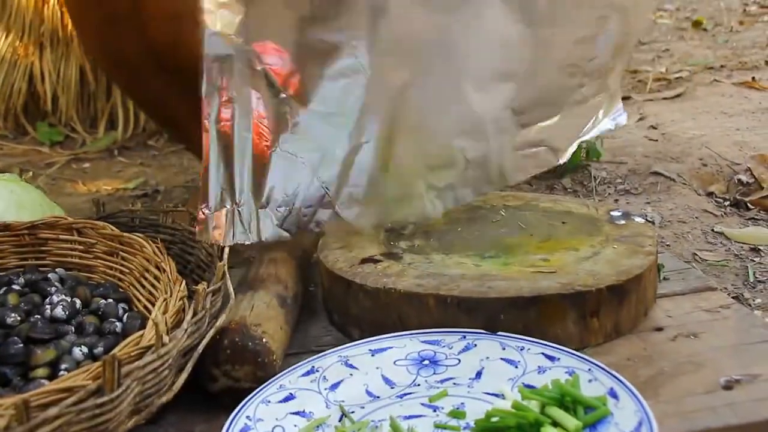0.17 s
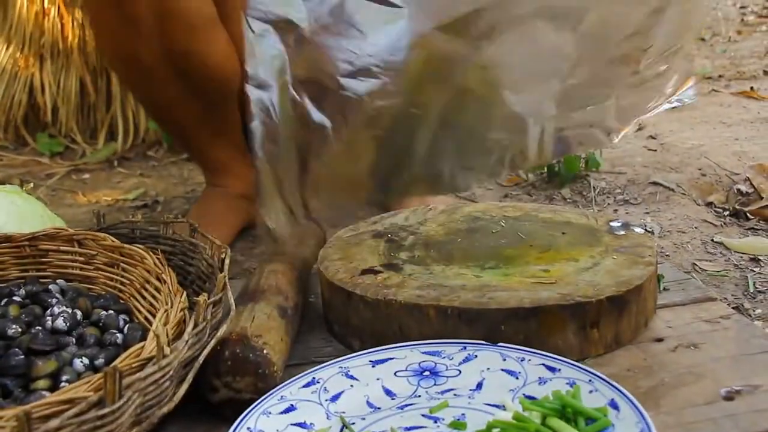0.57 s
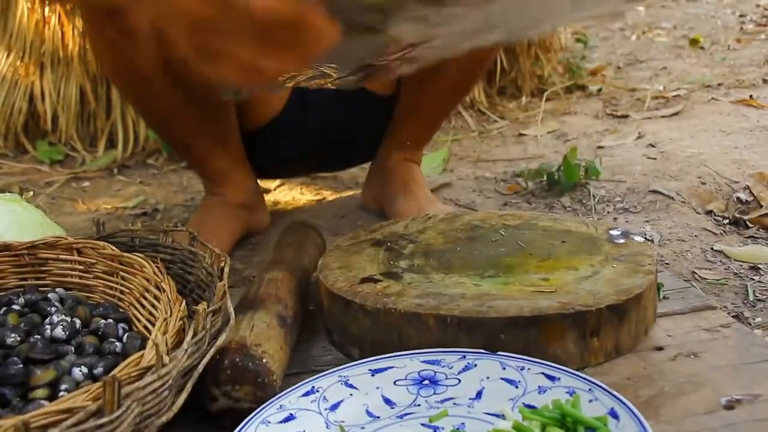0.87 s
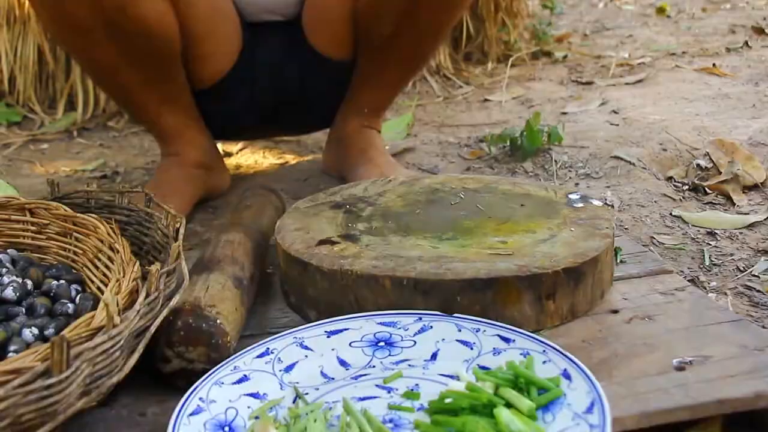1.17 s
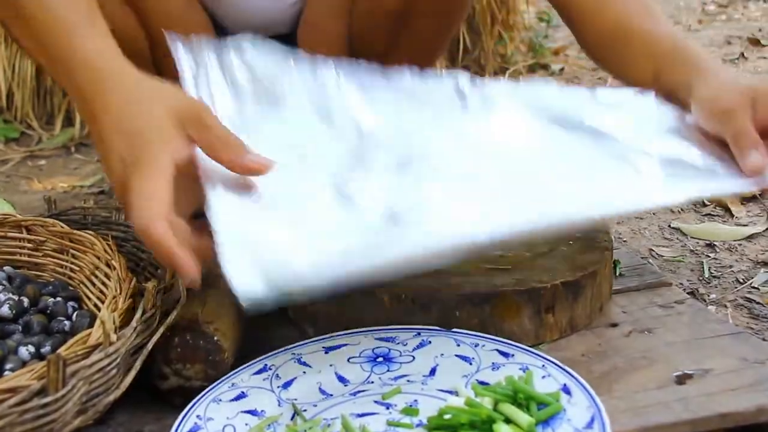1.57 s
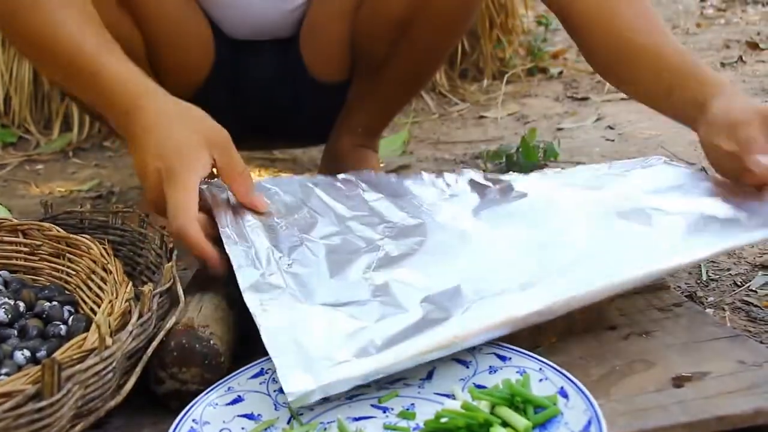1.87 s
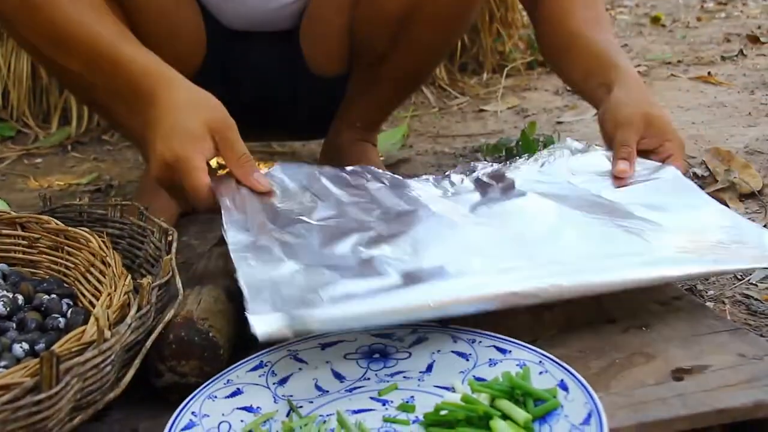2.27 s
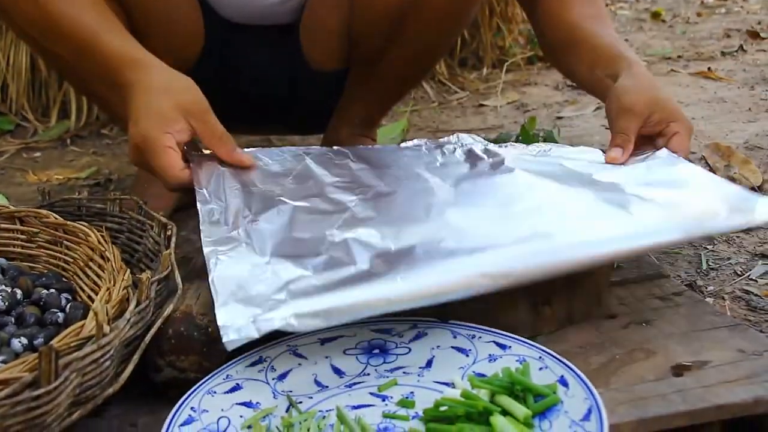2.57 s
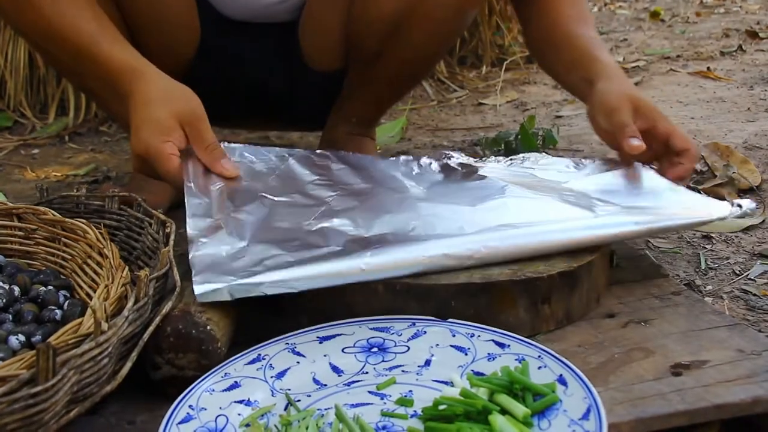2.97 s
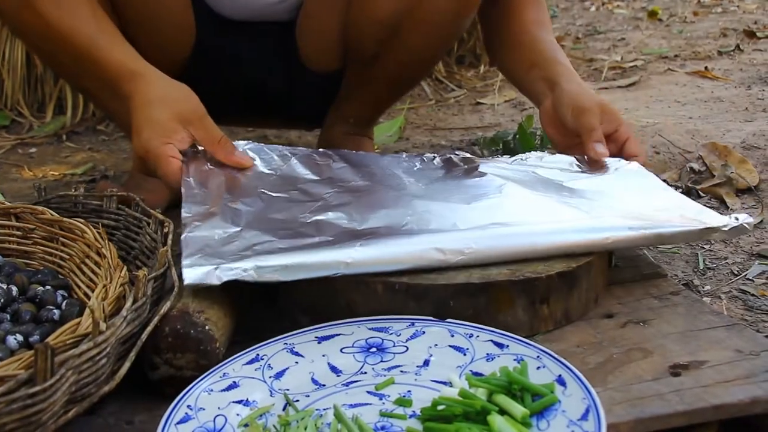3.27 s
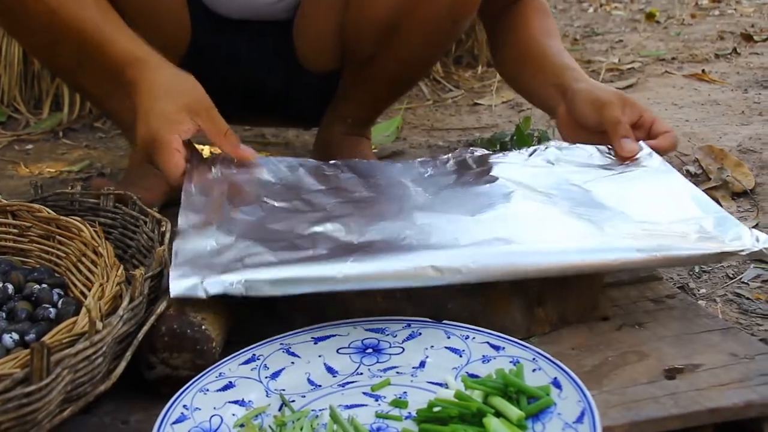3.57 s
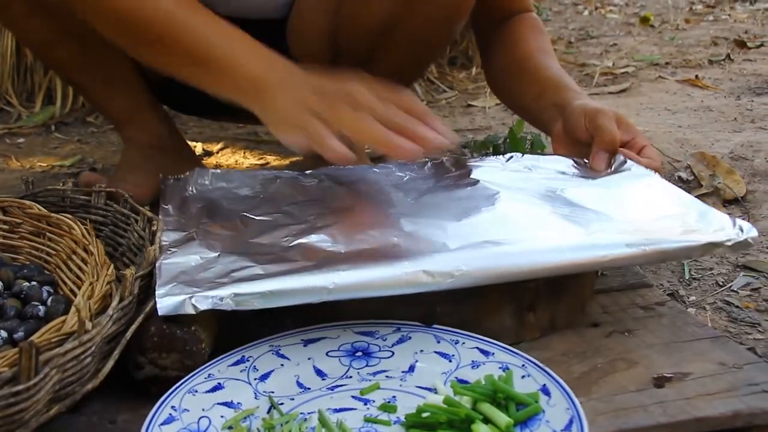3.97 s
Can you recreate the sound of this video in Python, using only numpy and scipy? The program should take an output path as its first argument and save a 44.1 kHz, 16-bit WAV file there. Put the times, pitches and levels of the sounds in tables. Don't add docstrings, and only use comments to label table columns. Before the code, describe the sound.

Close, dry, mono outdoor sound of aluminium foil being handled. From 0 to about 0.7 s, the sheet is tugged in quick, loud bursts: dense bright crinkling, needle-sharp clicks and several hard, pitched cracks, each with a tinny shimmer lasting under a tenth of a second, plus edge snaps and soft low flaps. It drops to lighter rustling around 0.75-0.9 s, crackles again near 1 s, then thins until about 1.5 s. At 1.55 and especially 1.75 s, strong crackles and a flap return as the sheet is swung round. From 2.05 to 3.1 s it is laid down and squared up in irregular heavy crunches, fuller in the middle and less hissy. After 3.2 s, quieter, scattered crinkles and small ticks continue with smoothing to the end, about 4.1 s. Behind it all are a faint dry rustle and a low, steady, throbbing distant small-engine drone.

```python
import sys
import numpy as np
from scipy import signal
from scipy.io import wavfile

SR = 44100
rng = np.random.default_rng(int(sys.argv[2]) if len(sys.argv) > 2 else 0)


def wav_record(signal):
    frames = np.transpose(np.atleast_2d(signal))
    bounded = np.clip(frames, -1, 1)
    quanta = np.round(bounded * 32767).astype(np.int16)
    wavfile.write(sys.argv[1], SR, quanta)


def magnitude_from_level(level_db):
    exponent = np.asarray(level_db, float) / 20
    return 10 ** exponent


N = 182260

# f/Hz, level/dB per Hz
SHEET_TONE = [(210, -38), (350, -13.5), (474, -16.5), (674, -3.5), (1140, -6), (1570, 2.5), (2800, 4),
              (4450, 2.5), (5060, 3.5), (7430, 1.5), (9750, -6.5), (13600, -6.5), (16000, -13)]
# start t/s, hold t/s, crumpling level/dB, fine creases level/dB re crumpling
HAND_STROKES = [(0.0, 0.076, -20, -7.5), (0.159, 0.0096, -13, -12), (.228, 0.061, -17, -12),
                (0.344, 0.032, -14, -12), (0.398, 0.037, -18.5, -9), (0.467, 0.021, -13.5, -8),
                (.56, .14, -20, -11), (0.821, 0.19, -25, -14.5), (0.935, 0.03, -18.5, -12),
                (0.994, 0.058, -19, -12), (1.234, 0.059, -28.5, -12), (1.49, 0.0082, -32, -18),
                (1.551, 0.049, -20, -14), (1.738, 0.08, -12.5, -17.5), (1.909, 0.076, -22, -23),
                (2.068, 0.017, -17, -11), (2.156, 0.085, -23, -26), (2.266, 0.12, -15, -16),
                (2.45, 0.045, -17.5, -11), (2.535, 0.033, -18, -15), (2.652, 0.011, -17.5, -16),
                (2.865, 0.036, -16, -20), (2.947, 0.018, -18.5, -7), (3.072, .055, -18.5, -10.5),
                (3.405, 0.027, -25.5, -10.5), (3.492, 0.091, -23, -14), (3.564, 0.062, -25.5, -11.5),
                (3.777, .015, -30, -25), (3.931, .05, -25, -25), (4.036, 0.0087, -21.5, -15)]
# t/s, restlessness level/dB, free folds level/dB re crumpling
SLACK_SHEET = [(0.0, -18, -9.5), (.7, -27.5, -10), (.76, -35, -14), (.9, -28.5, -12), (1.12, -27, -9),
               (1.34, -28, -14), (1.44, -32.5, -34), (1.7, -28, -10), (1.9, -25.5, -14.5),
               (2.2, -27, -11.5), (2.5, -22, -11.5), (2.8, -26.5, -8.5), (3.04, -19.5, -12),
               (3.15, -23.5, -9), (3.22, -33.5, -4.5), (3.5, -28, -8.5), (3.8, -25.5, -11.5),
               (4.13, -32, -10.5)]
# t/s, level/dB re crumpling
BELLY_LEVEL = [
    (0.0, -9.5),
    (1.9, -5.5),
    (2.3, -2.5),
    (4.13, -0.5),
]
# t/s, peak
# level/dB, highs level/dB re peak, favoured f/Hz
BIG_BUCKLES = [(0.138, -1, -20, 5310), (0.167, -2, -13, 5100), (0.23, 2.5, -20, 5140),
               (.3448, 1.5, -19, 3630), (.355, 3, -18, 4340), (.3998, -8.5, -22, 2670),
               (0.469, 1.5, -21, 3500), (0.5658, -1, -19, 3030), (0.6555, -2.5, -16, 2780),
               (0.8015, -11.5, -17, 6350), (.83, -12, -21, 3660), (.8505, -7, -17.5, 5400),
               (0.908, -9.5, -13, 5450), (0.934, -3.5, -13.5, 4930), (0.9973, 1.5, -21, 2700),
               (1.1248, -6, -17.5, 3570), (1.1638, -12.5, -17, 3050), (1.243, -8, -10.5, 7500),
               (1.282, -11.5, -15, 2400), (1.3408, -7.5, -24, 4470), (1.371, -9.5, -21, 2100),
               (1.3864, -10.5, -11, 7340),
               (1.4504, -15.5, -6.5, 5170), (1.496, -11, -27, 6000), (1.532, -12, -24, 6500),
                (1.551, -3, -11, 5900), (1.6635, -9, -28, 2000), (1.6862, -10, -25, 4840),
                (1.738, 3.5, -24, 1500), (1.762, 2.5, -29, 4500), (1.7982, -0.5, -12, 6350),
                (1.9222, -3, -23, 2780), (2.0582, -11, -17, 7210), (2.0736, -1, -15, 2170),
                (2.163, -2.5, -24, 2460), (2.2208, -3.5, -27, 2120), (2.2663, -1, -22, 3105),
                (2.3145, 4, -28, 2093), (2.361, 2.5, -18, 4970), (2.4326, -3, -21, 3180),
                (2.458, -0.5, -22, 2580), (2.483, -0.5, -16.5, 2090), (2.537, 2.5, -23, 2880),
                (2.638, -5.5, -30, 3170), (2.654, 0.5, -30, 1960), (2.709, -5.5, -22, 2800),
               (2.7719, -5.5, -17.5, 5810), (2.806, -8.5, -14, 6160), (2.8647, -3, -24, 1500),
                    (2.8835, 1.5, -32, 1598), (2.9405, -18, -26, 2870), (2.999, -1, -28, 2000),
                    (3.029, -3, -20, 3070), (3.054, -6.5, -20, 4000), (3.105, -2, -20, 3000),
                    (3.234, -10.5, -22.5, 1540), (3.2757, -15.5, -21, 5100), (3.291, -15, -21, 2140),
                    (3.3134, -12.5, -16, 5020), (3.351, -7.5, -27, 4140), (3.3728, -5.5, -15, 1570),
                    (3.4158, -23, -22, 5080), (3.488, -16, -22, 2150), (3.686, -8.5, -22, 4800),
                    (3.7636, -5, -17, 4915), (3.8017, -8, -19, 4000), (3.8372, -5.5, -27, 2090),
                    (3.8697, -7, -25, 3183), (3.929, -6.5, -24, 2040), (3.9415, -4.5, -21, 6400),
                    (3.9924, -7.5, -21, 2720), (4.0353, -11.5, -20, 2220)]
# t/s, peak level/dB
TINY_CREASES = [(0.7667, -32), (1.048, -15), (1.3244, -25), (1.6178, 0), (1.705, -25), (1.7274, -15),
                (1.952, -5), (2.0934, -23), (2.7322, -15), (3.0749, -13), (3.1602, -22), (3.1936, -41),
                (3.4994, -17), (3.5379, -2), (3.5738, -17), (3.6102, -2), (3.9165, -25), (4.0587, -4)]
# t/s, peak level/dB, f/Hz
EDGE_SLAPS = [(2.0752, -2.5, 760), (0.14, -6, 4300), (0.34, -3, 2808), (1.77, -6, 970), (3.3497, -10, 3500),
              (3.992, -19, 720), (1.3, -21, 5500), (1.496, -22, 3500), (1, -10, 5700), (1.8, -13, 3600),
              (2.5, -9, 6800)]
# t/s, level/dB
SHEET_FLAPS = [(.08, -29.5), (.14, -35.5), (.37, -32.5), (.41, -35), (.485, -39), (.97, -42),
               (1.745, -32.5), (2.07, -59), (2.45, -41.5), (2.75, -47), (3.1, -32.5), (3.45, -41)]
# f/Hz, level/dB per Hz
FLAP_TONE = [(60, -14), (120, -7), (270, 4.5), (380, -11), (520, -27.5)]
# f/Hz, level/dB per Hz
REST_TONE = [(1200, 9), (2500, 18), (5300, -3), (7400, -47), (9800, -53), (15800, -30)]
# t/s, firing f/Hz, drone level/dB
ENGINE_DRONE = [(0.0, 26.52, -37), (.35, 26.5, -41), (.53, 26.5, -57), (.6, 26.44, -39), (.79, 26.5, -40),
                (1.03, 26.6, -35), (1.72, 26.35, -35), (1.86, 26.4, -38), (2.05, 26.5, -35),
                (2.46, 26.3, -35.5), (3.2, 26.7, -34.5), (4.13, 26.4, -34.5)]
# multiple of firing f, level/dB
ENGINE_ORDERS = [(1, -32), (2, -12.5), (3, -24.5), (4, -17.5), (5, -17), (6, 1), (7, -5.5), (8, -16),
                 (9, -5), (10, -4), (11, -16.5), (12, -12)]
# f/Hz, level/dB per Hz
EXHAUST_TONE = [(22, -22), (35, -37), (50, -1.5), (120, 1), (300, -4.5), (450, -18), (750, -5.5),
                (1100, -23.5), (1500, -12)]


def rms_one(x):
    return x / np.sqrt(np.mean(x ** 2) + 1e-20)


def in_time(rows):
    s, *columns = np.transpose(rows)
    return [np.interp(np.arange(N) / SR, s, column) for column in columns]


def at_hz(points, hz):
    point_hz, db = np.transpose(points)
    return np.interp(np.log(hz), np.log(point_hz), db)


def drift(rate):
    r = np.exp(-80 * np.pi * rate / SR)
    slow = signal.lfilter([1], [1, -2 * r, r * r], rng.standard_normal(N // 40 + 2002))[2000:]
    return np.interp(np.arange(N) / 40, np.arange(len(slow)), rms_one(slow))


def band(x, low, high):
    return signal.sosfilt(signal.butter(2, [low, high], "band", fs=SR, output="sos"), x)


def dying(energy, t60):
    return signal.lfilter([1], [1, -magnitude_from_level(-120 / (t60 * SR))], energy + 1e-18)


def rumble(spectrum, patchy_db):
    edges = np.geomspace(20, 1500, 14)
    white = rng.standard_normal((2, N + SR))
    out = 0
    for k, (low, high) in enumerate(zip(edges, edges[1:])):
        level = magnitude_from_level(at_hz(spectrum, np.sqrt(low * high)) + patchy_db * drift(8.3))
        out = out + level * band(white[k % 2], low, high)[SR:]
    return rms_one(out)


def swells(start, hold, db, rise, sag, fall):
    t = np.arange(N) / SR - start[:, None]
    held = np.clip(t, 0, hold[:, None])
    released = np.maximum(t, 0) - held
    return magnitude_from_level(2 * (db[:, None] + rise * np.minimum(t, 0) - sag * held - fall * released))


def handling():
    start, hold, db, fine_db = np.transpose(HAND_STROKES)
    slack_db, folds_db = in_time(SLACK_SHEET)
    rise, sag = 2200, 3
    total = swells(start, hold, db, rise, sag, fall=321).sum(axis=0) + magnitude_from_level(2 * slack_db)
    fine = swells(start, hold, db + fine_db, rise, sag, fall=511).sum(axis=0)
    fine = fine + magnitude_from_level(2 * (slack_db - 17.5))
    return 10 * np.log10(total), folds_db, 10 * np.log10(fine / total), in_time(BELLY_LEVEL)[0]


def sheet_edges():
    return np.geomspace(330, 16500, 21)


def lows_and_highs(hz):
    return at_hz([(1000, 1), (1700, 0.0095)], hz), at_hz([(6000, 0.031), (11500, 0.78)], hz)


def ring_factor(hz):
    return (4000 / hz) ** 0.24


def sheet_weight(low, high):
    return magnitude_from_level(at_hz(SHEET_TONE, np.sqrt(low * high)) - 36.5) * np.sqrt(high - low)


def foil():
    white = rng.standard_normal((2, N))
    return crumpling(white) + buckles(white[::-1])


def crumpling(white, creases_per_s=1800, spread_db=4.0, own_db=4.0, t60=0.1, click_db=-1.0, wash_db=7.0):
    crumple_db, folds_db, fine_db, belly_db = handling()
    at = np.flatnonzero(rng.random(N) < creases_per_s * magnitude_from_level(1.6 * drift(25)) / SR)
    size_db = spread_db * np.minimum(rng.exponential(1, len(at)), 4.2)
    sign = rng.choice([-1, 1], len(at))
    edges, out = sheet_edges(), np.zeros(N)
    for k, (low, high) in enumerate(zip(edges, edges[1:])):
        hz = np.sqrt(low * high)
        clicks = np.zeros(N)
        clicks[at] = sign * magnitude_from_level(size_db + own_db * rng.standard_normal(len(at)))
        shimmer = dying(clicks ** 2, t60 * ring_factor(hz))
        shimmer = shimmer / shimmer.mean() + magnitude_from_level(2 * wash_db + 2.4 * drift(48))
        noise = rms_one(band(white[k % 2], low, high))
        bed = rms_one(noise * np.sqrt(shimmer) + magnitude_from_level(click_db) * rms_one(band(clicks, low, high)))
        lows, highs = lows_and_highs(hz)
        belly = at_hz([(1000, 0.031), (1700, 1), (2400, 0.55), (3300, 0.035)], hz)
        level_db = crumple_db - 3.5 + lows * (folds_db + 13.5)
        level_db += highs * (fine_db + 11.5) + belly * (belly_db + 4.5)
        out += sheet_weight(low, high) * magnitude_from_level(level_db) * bed
    return out


def buckles(white, t60=0.093, rise_s=0.0008, crack_db=4.0, crack_t60=0.011):
    s, peak_db, high_db, favoured_hz = np.array(BIG_BUCKLES).T
    at = (s * SR).astype(int)
    folds_db = in_time(SLACK_SHEET)[1]
    low_db = -20 + 0.74 * (folds_db[at] + 13)
    edges, out, ramp = sheet_edges(), np.zeros(N), np.arange(SR // 8) / SR
    own = rng.standard_normal((len(s), len(edges)))
    crack = 1 + magnitude_from_level(2 * crack_db - 120 * ramp / crack_t60)
    crack *= (1 - np.exp(-ramp / rise_s)) ** 2
    for k, (low, high) in enumerate(zip(edges, edges[1:])):
        hz = np.sqrt(low * high)
        lows, highs = lows_and_highs(hz)
        band_db = peak_db - 16.0 + lows * (low_db + 21) + highs * (high_db + 22.0) + 2.03 * own[:, k]
        band_db += 3.25 * np.exp(-(np.log2(hz / favoured_hz) / 0.28) ** 2)
        power = np.zeros(N + len(ramp))
        for start, level_db in zip(at, band_db):
            power[start:start + len(ramp)] += crack * magnitude_from_level(2 * level_db - 120 * ramp / (t60 * ring_factor(hz)))
        ringing = band(white[k % 2] * np.sqrt(power[:N]), low, high)
        out += sheet_weight(low, high) * ringing * np.sqrt(SR / 2 / (high - low))
    return out


def snaps(per_s=220, over_db=15.0, spread_db=2.0, low_hz=1500, top_hz=9000):
    crumple_db, _, fine_db, _ = handling()
    sizes = magnitude_from_level(spread_db * np.minimum(rng.exponential(1, N), 3.0)) * rng.choice([-1, 1], N)
    level = magnitude_from_level(crumple_db + over_db + 0.46 * (fine_db + 13.5))
    flips = sizes * (rng.random(N) < per_s / SR) * level
    return band(flips + 1e-18, low_hz, top_hz)


def ticks(low_hz=6000, top_hz=17000, t60=0.046):
    s, peak_db = np.transpose(TINY_CREASES)
    clicks = np.zeros(N)
    clicks[(s * SR).astype(int)] = magnitude_from_level(peak_db - 20.0)
    hiss = rng.standard_normal(N) * np.sqrt(dying(clicks ** 2, t60))
    return band(magnitude_from_level(-1.0) * clicks + hiss, low_hz, top_hz)


def slaps():
    out = np.zeros(N)
    t = np.arange(SR // 100) / SR
    for s, peak_db, hz in EDGE_SLAPS:
        push = np.sin(2 * np.pi * hz * t + 0.26) * np.exp(-hz * t * 1.2)
        out[int(s * SR):][:len(t)] -= magnitude_from_level(peak_db) * push
    return band(out, 200, 15000)


def flapping(stir_db=-47):
    s, db = np.transpose(SHEET_FLAPS)
    power = swells(s, 0 * s, db, rise=250, sag=0, fall=141).sum(axis=0) + magnitude_from_level(2 * stir_db)
    return magnitude_from_level(4.0) * np.sqrt(power) * rumble(FLAP_TONE, patchy_db=6.5)


def whisper():
    edges = np.geomspace(1200, 16500, 7)
    white, out = rng.standard_normal((2, N)), 0
    for k, (low, high) in enumerate(zip(edges, edges[1:])):
        level = magnitude_from_level(at_hz(REST_TONE, np.sqrt(low * high)) + 0.5 * drift(23))
        out = out + level * band(white[k % 2], low, high)
    return magnitude_from_level(-36.5) * rms_one(out)


def engine(rough_db=0.6):
    firing_hz, drone_db = in_time(ENGINE_DRONE)
    turn = 2 * np.pi * np.cumsum(firing_hz) / SR
    lines = 0
    for k, db in ENGINE_ORDERS:
        lines = lines + magnitude_from_level(db + rough_db * drift(3.8)) * np.sin(k * turn + 0.19 * drift(1.3))
    return magnitude_from_level(drone_db) * rms_one(lines)


def exhaust():
    drone_db = in_time(ENGINE_DRONE)[1]
    return magnitude_from_level(-40.5 + 1.1 * (drone_db + 36.5)) * rumble(EXHAUST_TONE, patchy_db=2.0)


def scene():
    sheet = foil() + snaps() + ticks() + slaps() + flapping()
    background = whisper() + engine() + exhaust()
    return np.tile(sheet + background, (2, 1))


def roll_off(x):
    return signal.sosfilt(signal.butter(12, 16870, fs=SR, output="sos"), x)


def record(dry):
    rounded = 1.272 * np.tanh(dry / 1.311)
    top_cut = signal.ellip(14, 0.5, 36, 15750, fs=SR, output="sos")
    return roll_off(signal.sosfilt(top_cut, rounded))


dry = scene()
out = record(dry)
wav_record(out)
```